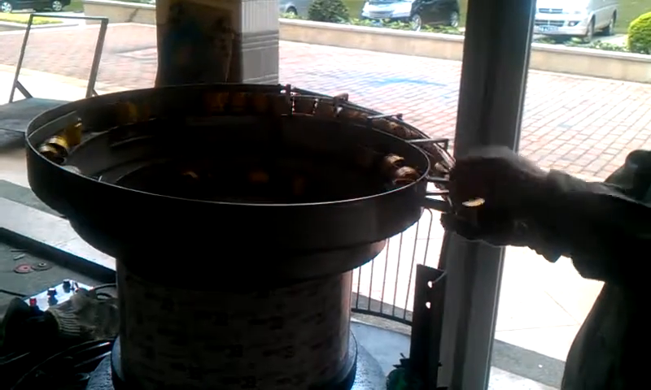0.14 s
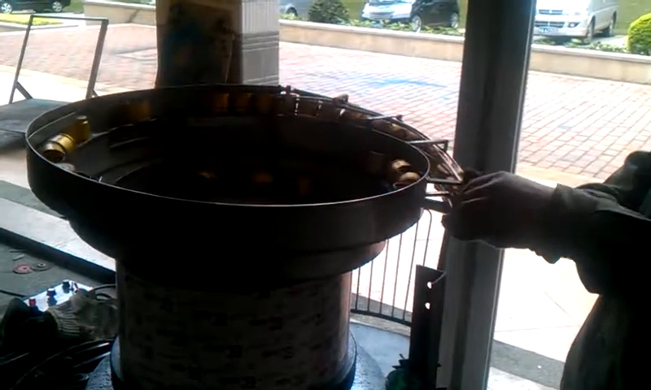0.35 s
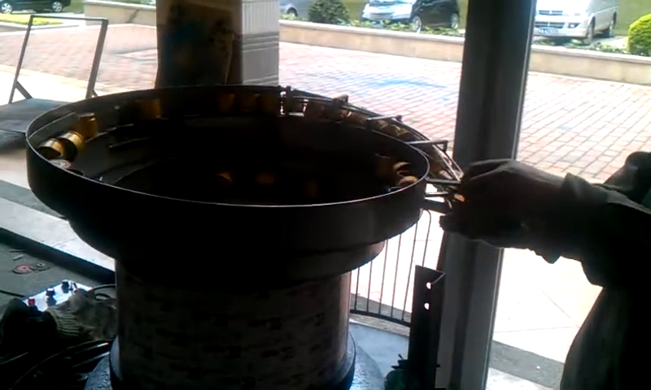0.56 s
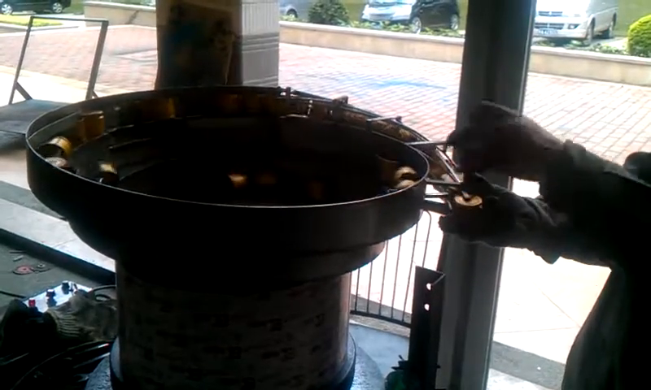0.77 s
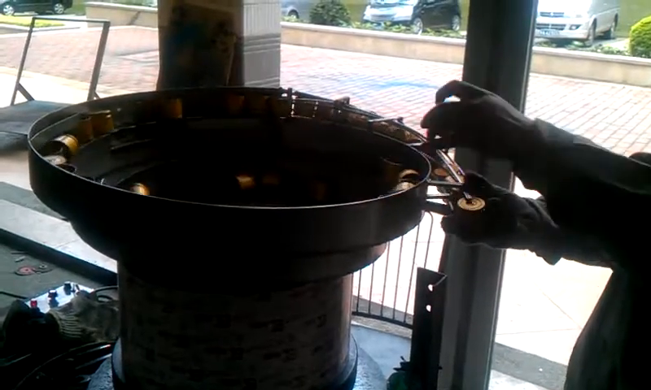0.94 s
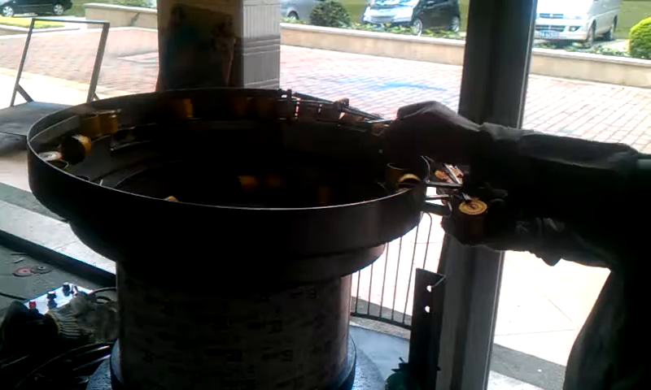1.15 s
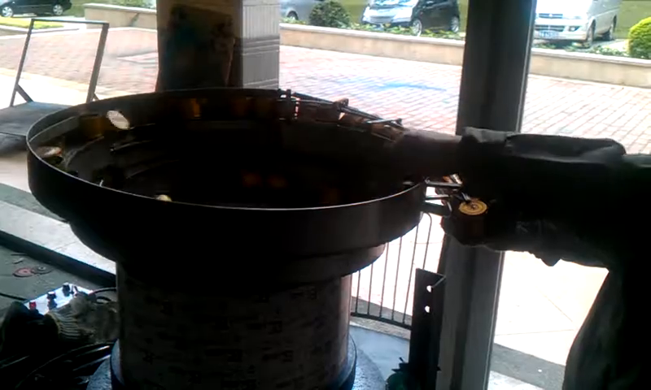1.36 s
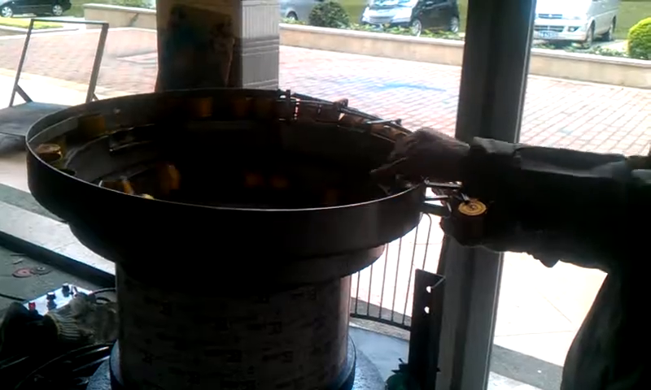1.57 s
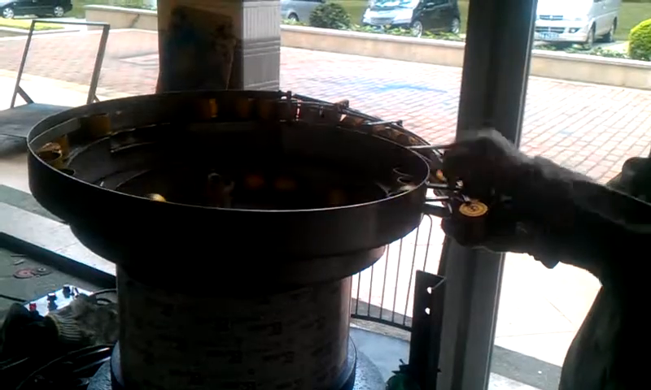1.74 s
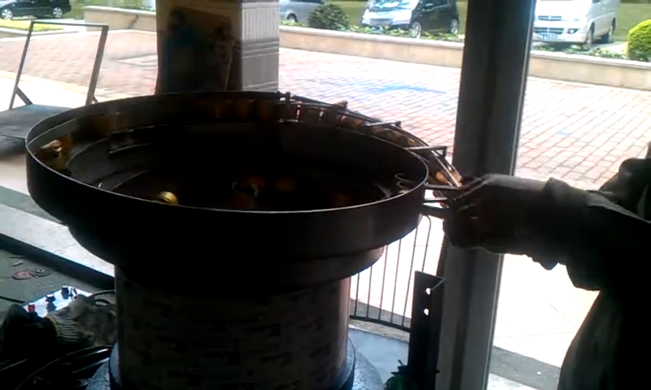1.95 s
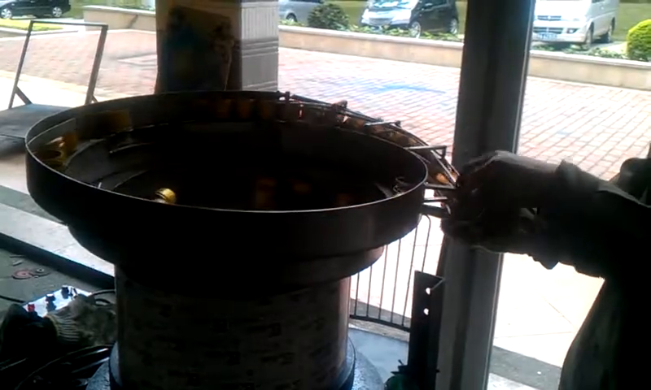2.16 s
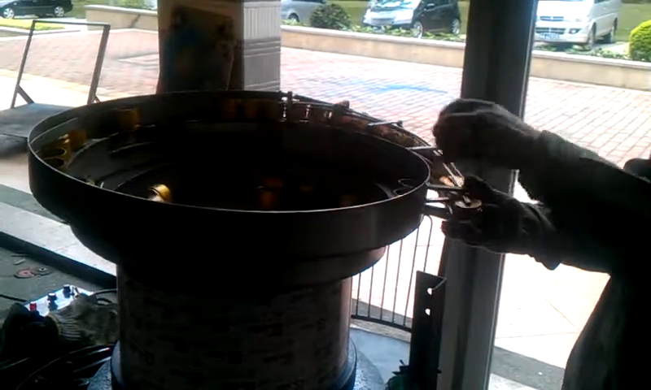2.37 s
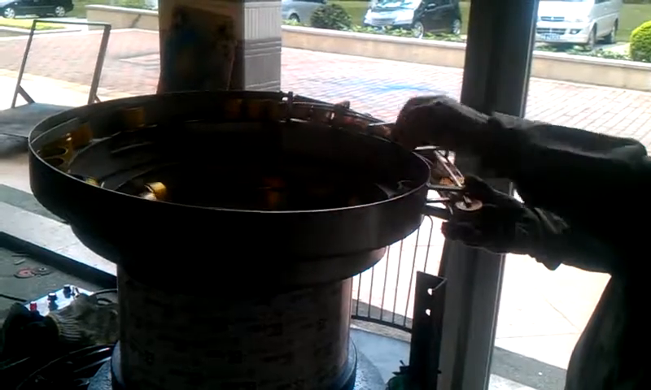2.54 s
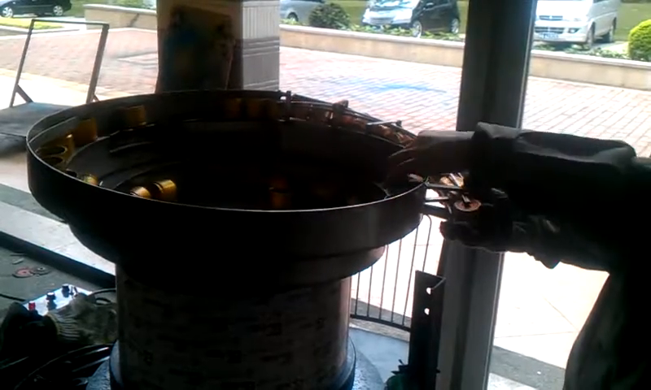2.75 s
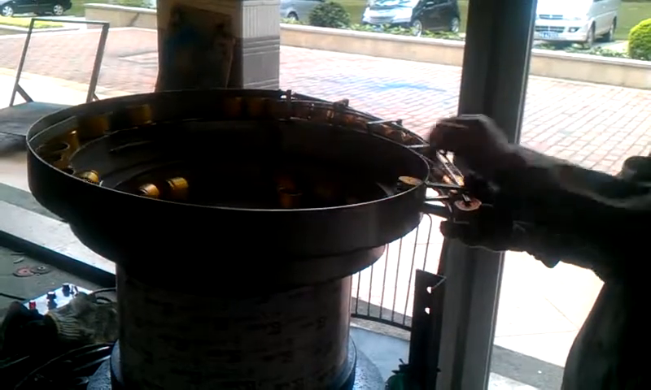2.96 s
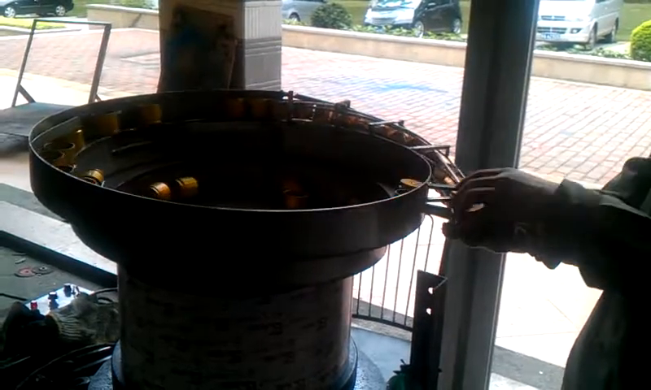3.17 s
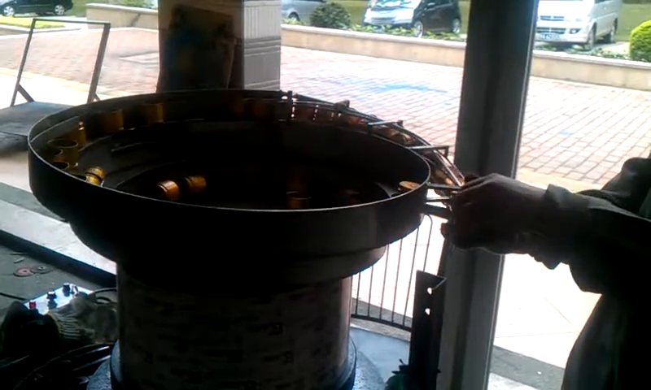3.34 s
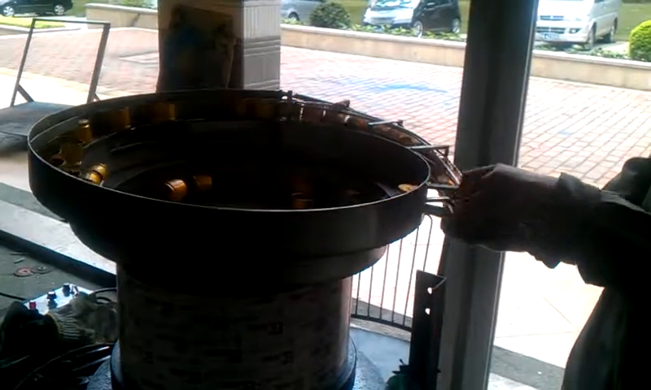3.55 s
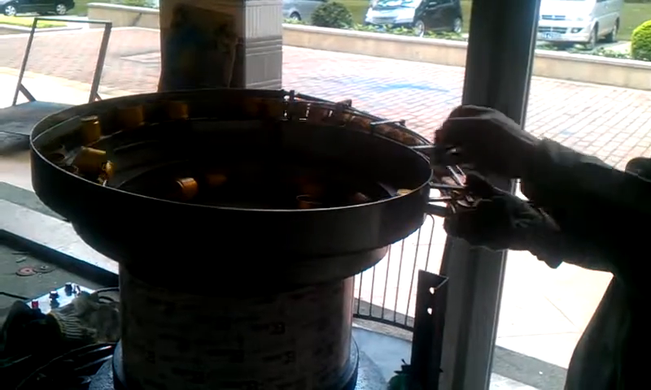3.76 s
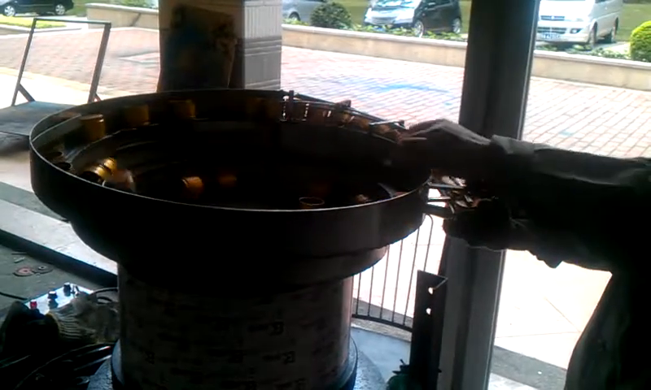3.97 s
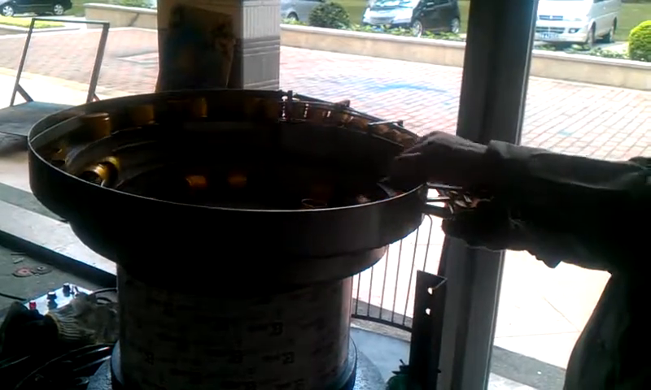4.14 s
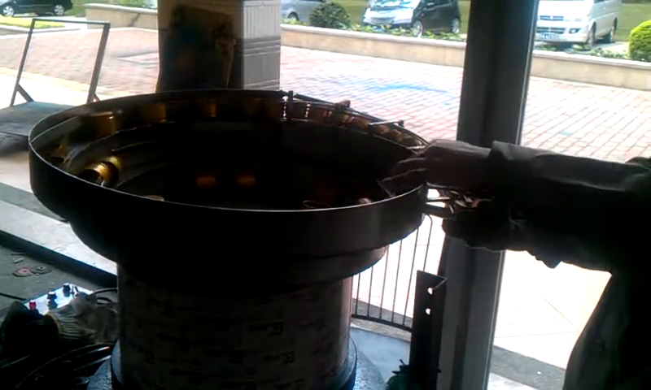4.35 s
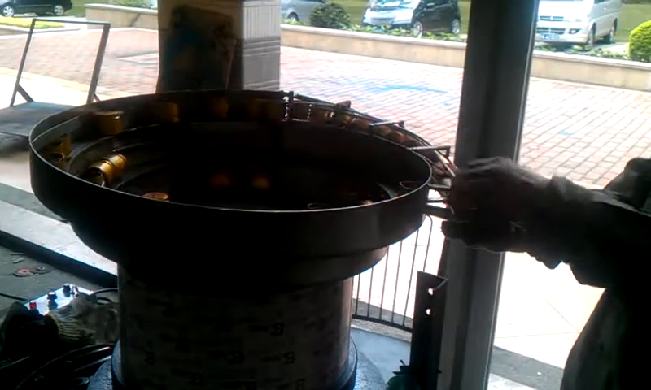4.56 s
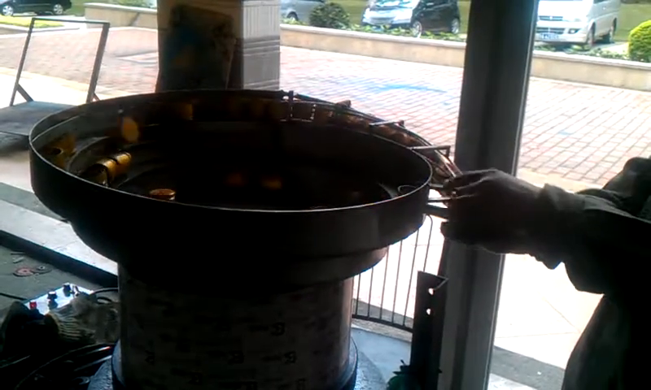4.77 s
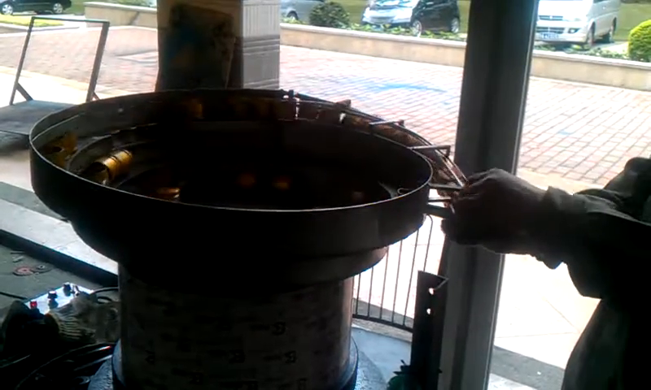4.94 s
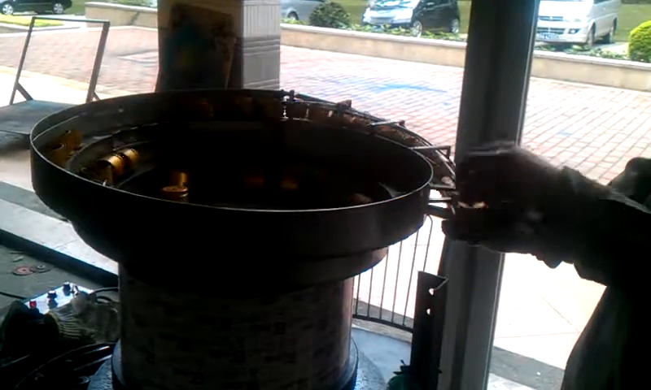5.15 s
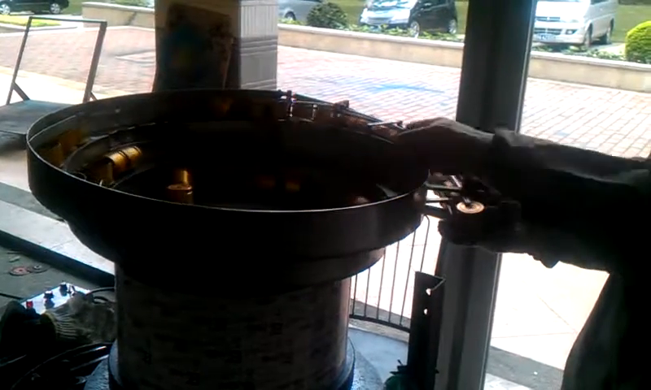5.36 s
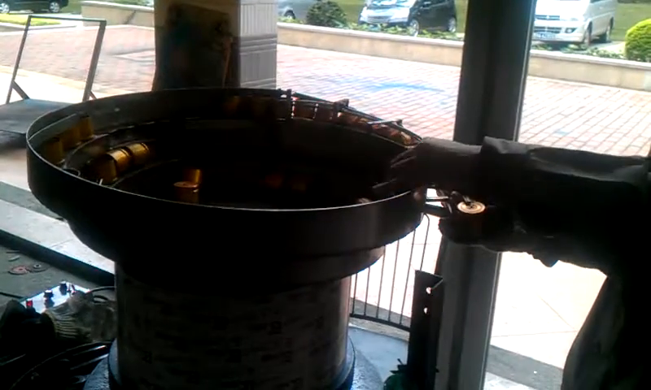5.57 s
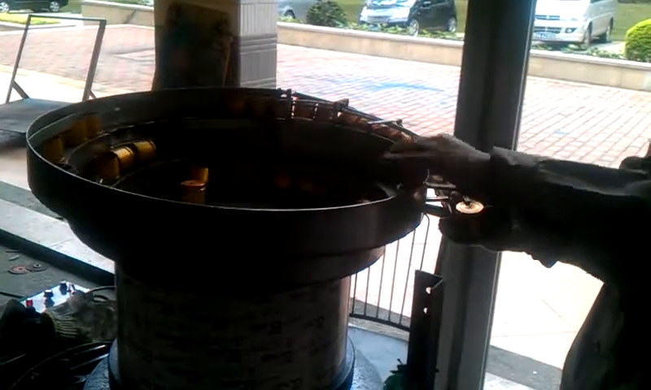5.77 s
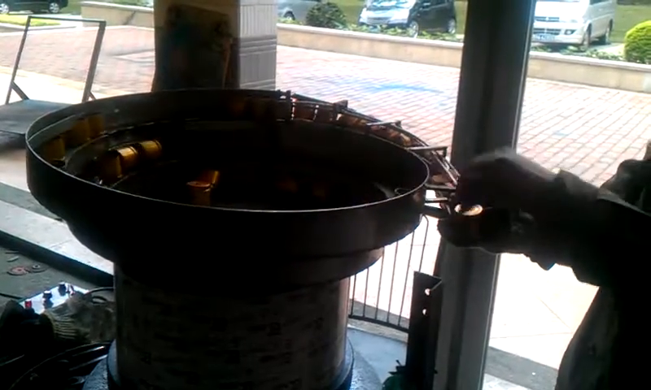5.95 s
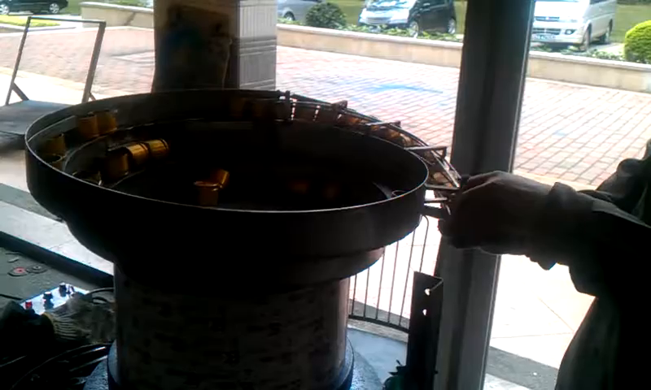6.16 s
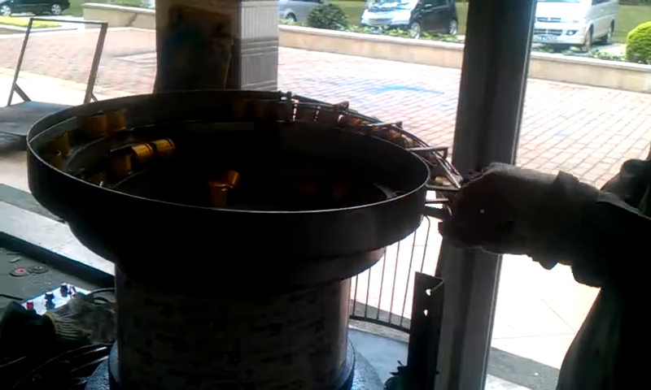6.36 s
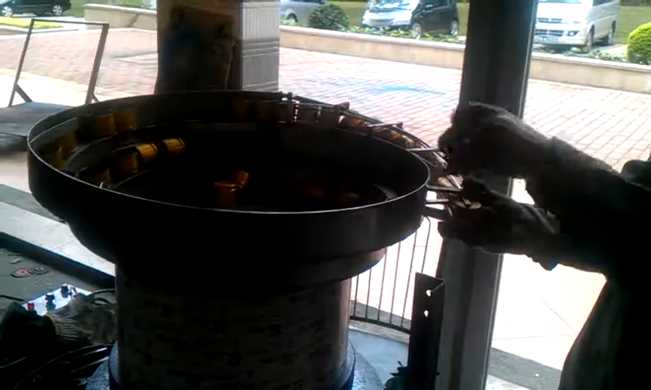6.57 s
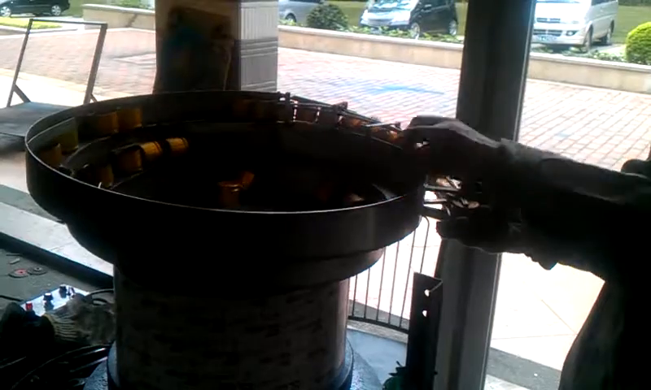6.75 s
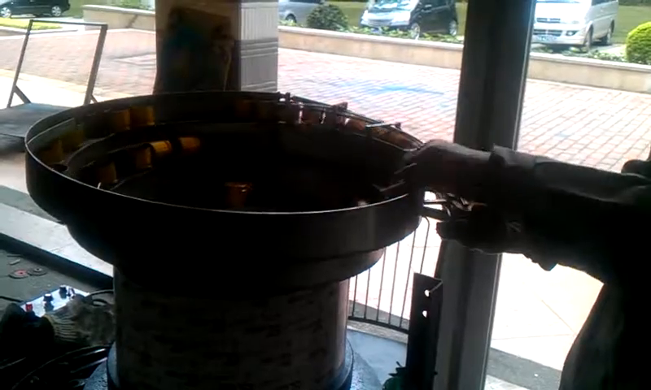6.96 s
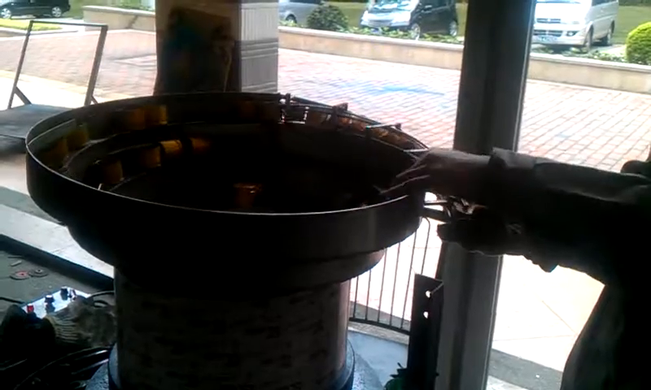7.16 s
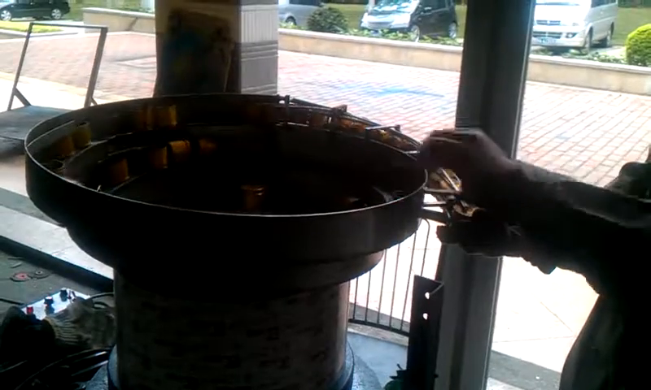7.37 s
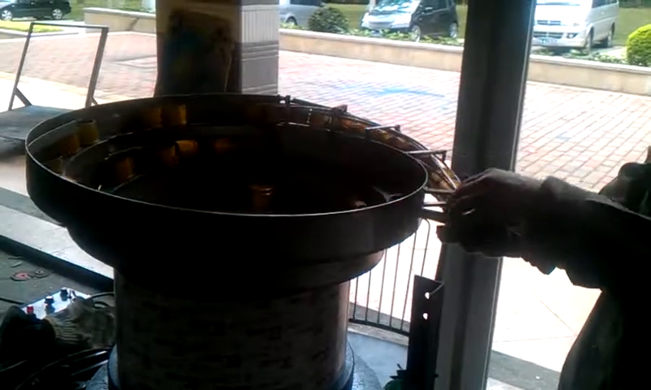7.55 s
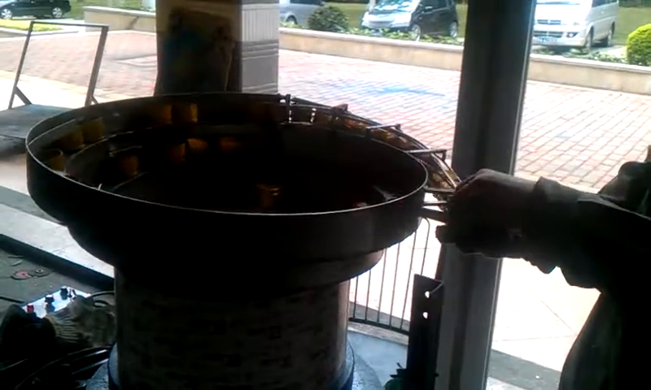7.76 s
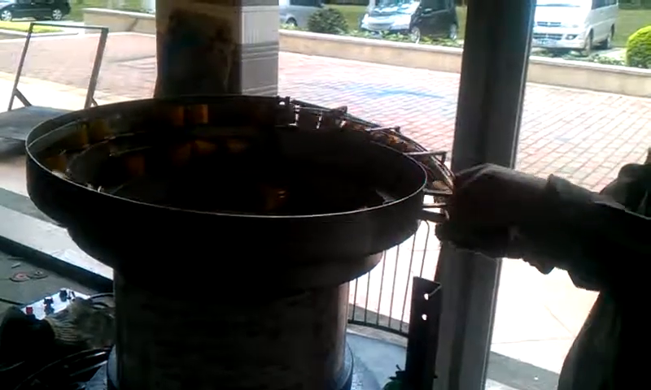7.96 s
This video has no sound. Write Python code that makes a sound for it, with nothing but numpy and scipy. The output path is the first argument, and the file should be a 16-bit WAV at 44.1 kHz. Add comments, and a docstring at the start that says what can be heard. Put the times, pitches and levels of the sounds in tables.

```python
"""Brass parts in a vibrating bowl feeder

A bowl feeder shakes small brass parts along its steel track, close to the microphone.
The parts hop on every stroke of the drive and keep the bowl ringing: a dense, bright, steady hiss.
Single parts chatter or knock, over a low workshop rumble. The sound overloads the microphone,
which flattens the level and smears the ringing into a rough wash."""
import sys
import numpy as np
from scipy import signal
from scipy.fft import rfft, irfft, next_fast_len
from scipy.io import wavfile
from scipy.ndimage import uniform_filter1d

SR = 44100
rng = np.random.default_rng(int(sys.argv[2]) if len(sys.argv) > 2 else 0)


def master(y):
    """Save y as 16-bit WAV."""
    cut = np.clip(np.atleast_2d(y).T, -1, 1)
    pcm = np.round(cut * 32767)  # scale
    wavfile.write(sys.argv[1], SR, pcm.astype(np.int16))


N = 353221
T = np.arange(N) / SR
STROKE_HZ = 100  # how often the drive shakes the bowl

# the broad tone of brass striking steel: pitch_hz, level_db
BRASS_ON_STEEL = [(200, -28.5), (600, -21.5), (1700, -16), (2800, -9.5), (4050, -8.5), (4950, -2.5),
                  (5900, -2.5), (6400, -0.5), (7150, -0.5), (7800, -5), (8300, -2.5), (8900, -9.5),
                  (11200, -14), (15000, -30)]
# the notes the bowl and track ring at: pitch_hz, level_db, fade_s (time to fall by 60 dB)
BOWL_NOTES = [(552.3, -21.5, 0.35), (870, -21.5, 0.068), (1202, -21, 0.09), (1537, -22, .25),
              (1914, -19.5, 0.074), (2250, -17.5, 0.048), (2690, -12.5, .05), (3040, -17.5, 0.065),
              (3502, -14, 0.047), (3965, -16.5, .07), (4950, -7, 0.034), (5260, -8.5, 0.13),
              (5737, -10, 0.089), (6335, -9, 0.13), (6777, -4, 0.072), (7078, -5, .1), (7207, -7, 0.17),
              (8053, -8.5, 0.068), (8354, -9, 0.057)]
# the tone of the rumble from the drive and the workshop: pitch_hz, level_db
RUMBLE = [(20, -19), (60, 10.5), (150, -7.5), (300, -0.5), (700, -10), (2000, -18.5), (6000, -48)]
# the steady hum of machinery: pitch_hz, level_db
MACHINE_HUM = [(59, -48), (71, -42)]
# single parts that chatter against the track: start_s, pitch_hz, level_db
CHATTERING_PARTS = [(.11, 3400, -4), (1.08, 1960, -8), (1.12, 1473, -15.5), (1.22, 3520, -7.5),
                    (1.22, 4510, -4.5), (4.47, 2060, -11), (6.36, 1524, -15), (6.62, 2020, -11.5),
                    (7.13, 1524, -12)]
# parts that drop and knock on the bowl: start_s, pitch_hz, level_db
DROPPED_PARTS = [(1.772, 862, -3.5), (2.181, 1200, -9)]
# the recorder's tone, mostly a cut in the bass: pitch_hz, level_db
RECORDER_TONE = [(20, -13), (70, -8), (250, -1.0), (1000, 0.5), (7000, 0), (11000, -0.5),
                 (13500, 0), (15500, 0.5)]


def amp(db):
    """Turns decibels into a number to multiply by."""
    return 10 ** (np.asarray(db) / 20)


def unit(x):
    """Scales a sound to an average (rms) level of 1."""
    return x / np.sqrt(np.mean(x ** 2) + 1e-20)


def colour(x, points):
    """Shapes a sound's tone along a curve of (pitch_hz, level_db) points."""
    hz, db = np.transpose(points)
    size = next_fast_len(len(x) + 4096)
    gain = amp(np.interp(np.log(np.fft.rfftfreq(size, 1 / SR) + 1), np.log(hz), db))
    return irfft(rfft(x, size) * gain, size)[:len(x)]


def drift(shape, size):
    """A grid of random values, smoothed over `size` cells in each direction."""
    field = rng.standard_normal(shape)
    for axis, cells in enumerate(size):
        field = uniform_filter1d(uniform_filter1d(field, cells, axis), cells, axis)
    return unit(field)


def landings(per_s, bunching, spread_db):
    """Clicks of hopping parts, uneven in size and a little more likely as the bowl swings up."""
    swing = np.cos(2 * np.pi * STROKE_HZ * T)
    chance = per_s / SR * (1 + np.clip(bunching, 0, 1) * swing)
    at = np.flatnonzero(rng.random(N) < chance)
    size, side = rng.standard_normal((2, N), dtype=np.float32)[:, at]
    clicks = np.zeros(N)
    clicks[at] = amp(spread_db * size) * np.sign(side)
    return clicks


def clatter(fade_s=0.083, ring_db=3, flicker_db=0.72):
    """Each hopping part lands with a tick and a short ring; the tone shifts as the parts travel."""
    t = T[:SR // 8]
    out = np.zeros(N)
    for _ in range(10):  # stretches of track, each with its own ring
        ring = rng.standard_normal(len(t)) * amp(-60 * t / fade_s)  # noise acts as countless notes
        ring *= amp(ring_db) / np.linalg.norm(ring)
        ring[0] += 1  # the tick
        hits = landings(per_s=300, bunching=.15, spread_db=3.5)
        out += signal.oaconvolve(hits, ring)[:N]  # one ring for every hit
    # split the sound by pitch and time, and let each patch wander a little in level
    patches = signal.stft(out, nperseg=1024, noverlap=768)[2]
    patches *= amp(flicker_db * drift(patches.shape, size=(5, 24)))
    flickering = signal.istft(patches, nperseg=1024, noverlap=768)[1][:N]
    return unit(colour(flickering, BRASS_ON_STEEL))


def pings(fade_s=.15, spread_db=2, count=2000):
    """Parts that hit each other ring briefly, each at its own pitch."""
    t = T[:SR // 10]
    fade = amp(-60 * t / fade_s)
    out = np.zeros(N + len(t))
    for when, height, strength in rng.random((count, 3)):
        pitch_hz = 3000 + height * 6000
        start = int(when * N)
        out[start:start + len(t)] += amp(spread_db * strength) * fade * np.sin(2 * np.pi * pitch_hz * t)
    return unit(colour(out[:N], BRASS_ON_STEEL))


def bowl():
    """A rain of landing parts keeps the bowl's strongest notes ringing."""
    t, out = T[:SR // 2], np.zeros(N)
    for pitch_hz, level_db, fade_s in BOWL_NOTES:
        ring = np.sin(2 * np.pi * pitch_hz * t) * amp(-60 * t / fade_s)
        hits = landings(per_s=900, bunching=.15, spread_db=4)
        out += amp(level_db) * unit(signal.oaconvolve(hits, ring)[:N])
    return out


def workshop(rumble_db=-28, swell_db=-28, swell_at_s=7.4, swell_width_s=.17, swell_below_hz=80):
    """The drive and the workshop rumble, machinery hums faintly, and the deep rumble swells once."""
    hum = sum(amp(level_db) * np.sin(2 * np.pi * (pitch_hz * T + rng.random()))
              for pitch_hz, level_db in MACHINE_HUM)
    keep_bass = signal.butter(2, swell_below_hz, fs=SR, output="sos")
    deep_noise = unit(signal.sosfilt(keep_bass, rng.standard_normal(N)))
    swell = amp(swell_db) * np.exp(-((T - swell_at_s) / swell_width_s) ** 2) * deep_noise
    rumble = amp(rumble_db) * unit(colour(rng.standard_normal(N), RUMBLE))
    return rumble + hum + swell


def add(mix, start_s, sound):
    """Adds a sound to the mix at the given time."""
    part = mix[round(start_s * SR):][:len(sound)]
    part += sound[:len(part)]


def shaken_ring(pitch_hz, blur_hz, rise_s, fade_s):
    """One part's ring builds up and dies away while the shaking track blurs its pitch."""
    t = T[:SR]
    wobble = np.cumsum(rng.standard_normal(SR)) * np.sqrt(np.pi * blur_hz / SR)
    loudness = (1 - np.exp(-t / rise_s)) * amp(-60 * t / fade_s)
    return loudness * np.sin(2 * np.pi * pitch_hz * t + wobble)


def chatters():
    """Single parts chatter against the track, sing out and fade."""
    out = np.zeros(N)
    for start_s, pitch_hz, level_db in CHATTERING_PARTS:
        blur_hz = 11 * (pitch_hz / 1000) ** 2  # the higher the pitch, the rougher the ring
        add(out, start_s, amp(level_db) * shaken_ring(pitch_hz, blur_hz, rise_s=.06, fade_s=1.17))
    return out


def knocks(blur_hz=45):
    """A part drops on the bowl and gives a quick, short ring of two notes."""
    out = np.zeros(N)
    for start_s, pitch_hz, level_db in DROPPED_PARTS:
        for ratio, note_db in (1, 0), (3.02, -4.5):  # the main note, then a higher, softer one
            ring = shaken_ring(ratio * pitch_hz, ratio * blur_hz, rise_s=.004, fade_s=.17)
            add(out, start_s, amp(level_db + note_db) * ring)
    return out


def scene(clatter_db=-.5, pings_db=-7, bowl_db=-10.5):
    """All the sounds meet at one microphone; left and right are the same."""
    hiss = amp(clatter_db) * clatter() + amp(pings_db) * pings() + amp(bowl_db) * bowl()
    mono = hiss + workshop() + chatters() + knocks()
    return np.array([mono, mono])


def overload(sound, boost_db, substeps=4):
    """The sound is too loud for the microphone's input, so its peaks are squashed flat."""
    fine = signal.resample_poly(sound, substeps, 1)  # finer time steps avoid false tones
    squashed = np.tanh(amp(boost_db) * fine)
    return signal.resample_poly(squashed, 1, substeps)


def record(dry, output_db=-17, stop_s=7.629, highest_hz=15780):
    """The recorder overloads, thins the bass, stops suddenly and cuts the very highest treble."""
    sound = overload(dry.mean(0), boost_db=14)
    sound = amp(output_db) * colour(sound, RECORDER_TONE)
    # the recorder's filter delays the treble a little, which roughens the flattened peaks
    sound = signal.sosfilt(signal.butter(20, 16200, fs=SR, output="sos"), sound)
    sound *= T < stop_s
    treble_cut = signal.firwin(701, highest_hz, window=("kaiser", 9), fs=SR)
    sound = signal.oaconvolve(sound, treble_cut, "same")
    return np.array([sound, sound])


dry = scene()
out = record(dry)
master(out)
```